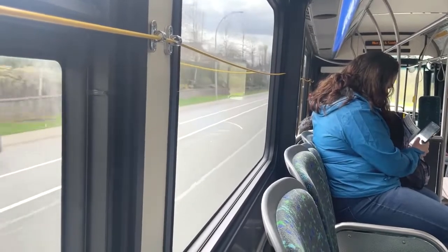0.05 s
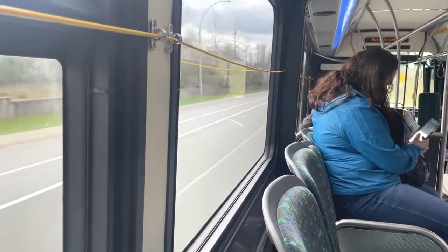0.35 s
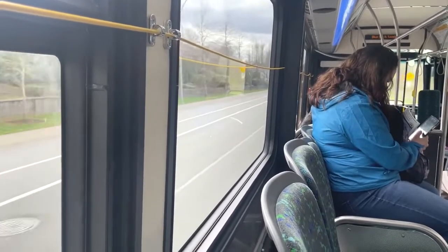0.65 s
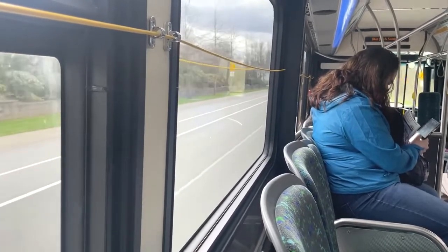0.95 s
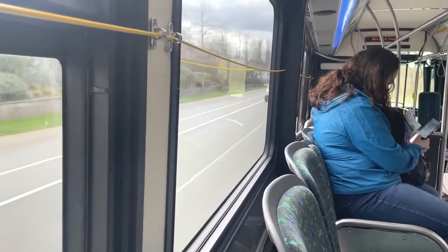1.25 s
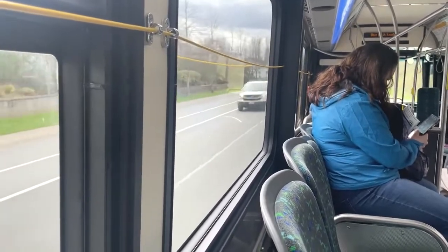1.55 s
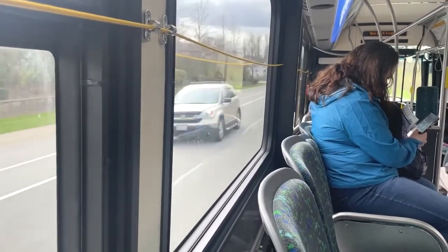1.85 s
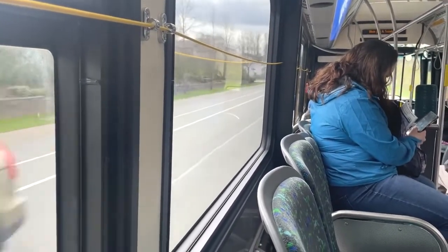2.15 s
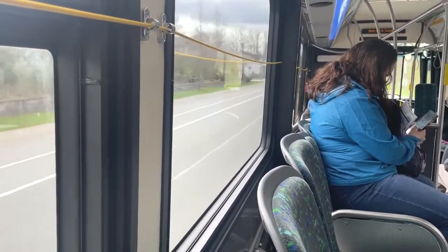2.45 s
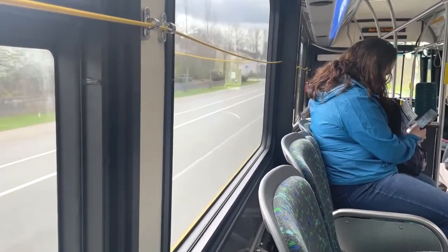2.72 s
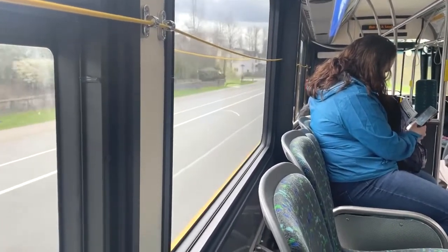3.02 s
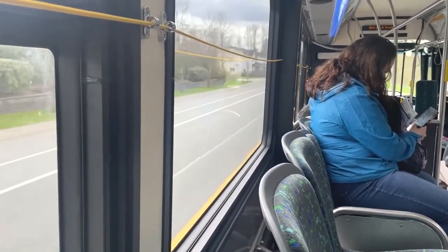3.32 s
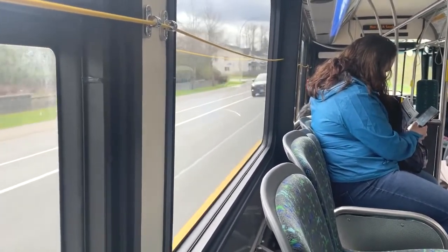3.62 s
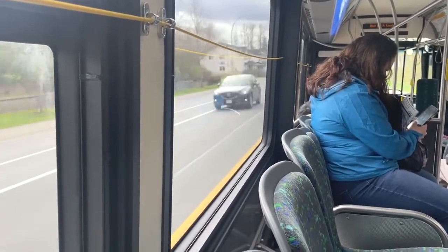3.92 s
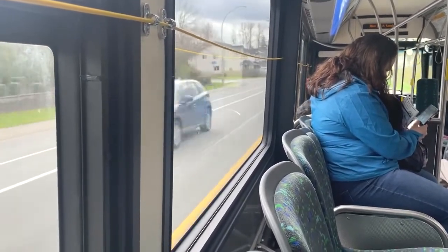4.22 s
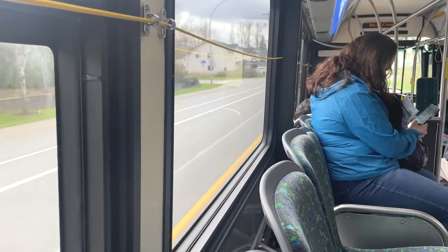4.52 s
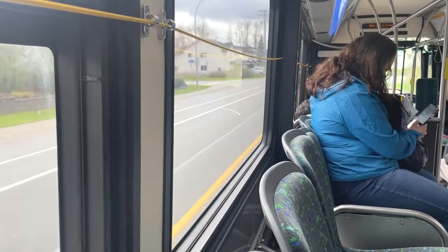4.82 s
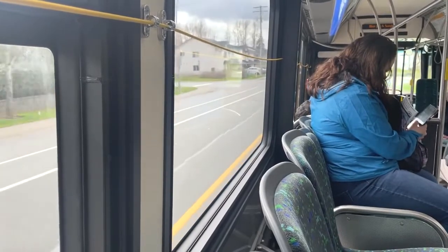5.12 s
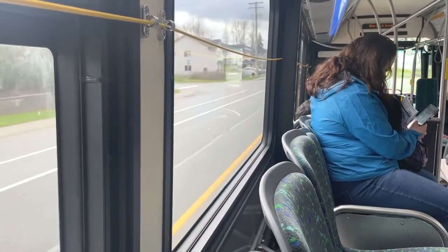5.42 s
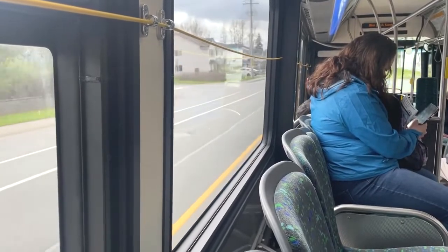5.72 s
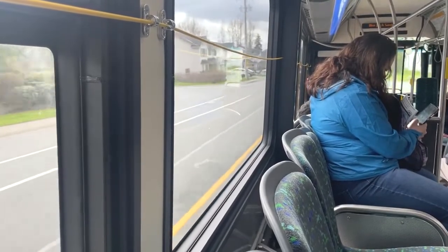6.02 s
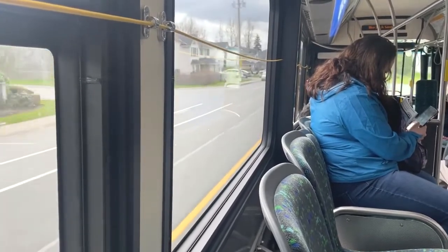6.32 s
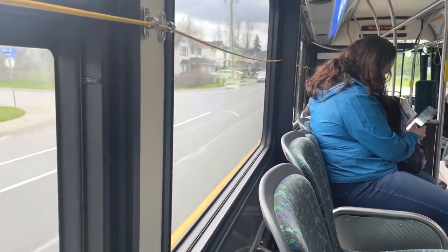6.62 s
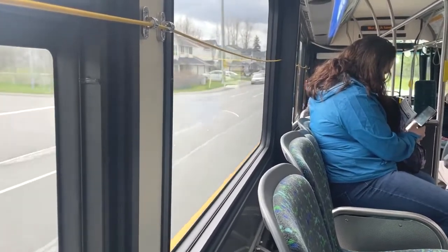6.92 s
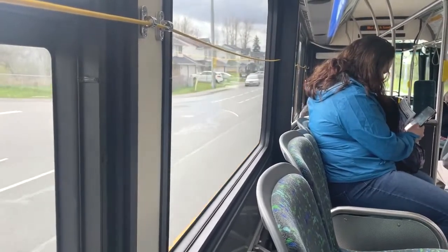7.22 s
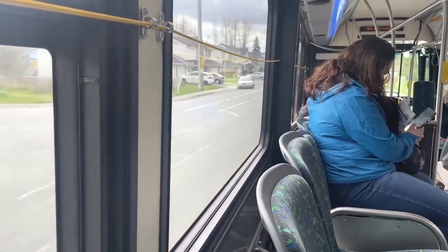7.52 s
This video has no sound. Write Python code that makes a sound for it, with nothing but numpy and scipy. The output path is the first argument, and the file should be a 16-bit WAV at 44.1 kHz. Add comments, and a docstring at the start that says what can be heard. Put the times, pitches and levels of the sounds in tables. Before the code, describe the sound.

Inside a moving city bus, a deep diesel hum swells over steady tyre roar while fittings chirp, tick and clink.

```python
"""A deep diesel boom over tyre roar, heard from a seat in a moving city bus. The six-cylinder engine
slowly loses revs, so its firing note sinks into a cabin resonance and grows louder, throbbing against
the propeller shaft. A pump hums, the alternator whines faintly and the road rumbles through the body.
As the bus shakes, a dry fitting chirps, window trim ticks and a loose metal part clinks."""
import sys
import numpy as np
from scipy import signal
from scipy.fft import rfft, irfft
from scipy.io import wavfile

SR = 44100
rng = np.random.default_rng(int(sys.argv[2]) if len(sys.argv) > 2 else 0)


def unload_audio(sound):
    """Save the sound as a 16-bit wav file, at the path given as the first command line argument."""
    columns = np.transpose(np.atleast_2d(sound))
    # keep every value between -1 and 1, then stretch to whole-number steps
    steps = np.round(np.clip(columns, -1, 1) * 32767)
    wavfile.write(sys.argv[1], SR, steps.astype(np.int16))


N = 333396
TIME = np.arange(N) / SR
BIN_HZ = np.maximum(np.arange(N // 2 + 1) * SR / N, 1)
OPPOSED = np.array([[1], [-1]])   # pan_db is left minus right; lead_rad is the left side's phase lead


# the firing note swells as it sinks into the cabin resonance: time_s, level_db
FIRING_LEVEL = [(0, -22.5), (.8, -25), (1.1, -19.5), (1.4, -18.5), (2.15, -20), (2.5, -18), (3, -18),
                (3.7, -14.5), (5, -13.5), (7.5, -13)]
# its stereo place shifts as the pitch falls: time_s, pan_db, lead_rad
FIRING_PATH = [(0, -1.6, .7), (1.1, -3.2, .34), (2.1, -3.2, .27), (3.1, -2.8, .07), (5.1, -1.4, .01),
               (7.5, -.8, .02)]
# the hum at four times crank speed: time_s, level_db
FOURTH_LEVEL = [(0.0, -25), (0.6, -23), (1.05, -29), (1.5, -25.5), (2.3, -28), (3.3, -32), (4, -29),
                (5.8, -29), (7.3, -27)]
# the growl dies down as the engine is unloaded: crank_multiple, initial_db, fade_db_per_s, pan_db
GROWL_ORDERS = [(9, -35, 2.2, -6.5), (10, -35, 3, -0.5), (12, -48, 1.5, 0)]
# the bed of lesser engine tones: crank_multiple, mid_gain_db, side_gain_db
ENGINE_ORDERS = [(1, -41, -63), (1.5, -37, -69), (2, -37, -57), (2.5, -37, -70), (4.5, -40, -54),
                 (5, -38, -55), (6, -46, -53), (7.5, -45, -69), (15, -49, -54), (17, -52, -54),
                 (23, -54, -60), (25, -59, -58), (26, -55, -60), (27, -50, -47.5), (28, -58, -55),
                 (30, -56, -54), (33, -58, -61), (35, -55, -65), (36, -57, -59), (40, -57, -56),
                 (42, -57, -55)]

def engine(crank_hz):
    """Three firings a turn boom in the cabin; the other engine orders hum and growl around them."""
    firing_db, fourth_db = in_time(FIRING_LEVEL) + in_time(FOURTH_LEVEL)
    crank = turning(crank_hz)
    boom = tone(3 * crank, firing_db, *in_time(FIRING_PATH))
    hum = tone(4 * crank, fourth_db + .98 * drift(1.2), pan_db=1, lead_rad=.09)
    growl = 0
    for multiple, initial_db, fade_db_per_s, pan_db in GROWL_ORDERS:
        level_db = initial_db - fade_db_per_s * TIME + 2.2 * drift(3.5)
        growl += tone(multiple * crank, level_db, pan_db, lead_rad=-.3)
    bed = from_db(1.2) * orders(crank + .028 * drift(1.8), ENGINE_ORDERS, waver_db=2)
    return boom + hum + growl + bed


# the shaft's throb: time_s, level_db
THROB_LEVEL = [(0, -46), (.8, -42), (1.2, -29), (1.7, -33), (2.35, -22), (3.1, -23.7), (3.6, -18.5),
               (3.95, -28), (4.4, -20), (5, -28), (5.45, -24.5), (6, -36), (6.6, -40), (7.5, -37)]
# its lesser tones: shaft_multiple, mid_db, side_db
SHAFT_ORDERS = [(1, -33, -48), (4, -40, -56)]

def propeller_shaft(crank_hz, overdrive_ratio=1.3592):
    """The joints pulse twice a turn, just below the firing note, and the two beat."""
    throb_db, = in_time(THROB_LEVEL)
    overrun = 1 + .0089 * np.exp(-TIME / 1.4)   # at first the wheels run a little ahead of the engine
    shaft = turning(overdrive_ratio * crank_hz * overrun)
    throb = tone(2 * shaft + .047 * drift(1.6), throb_db, pan_db=.7, lead_rad=0)
    return throb + orders(shaft, SHAFT_ORDERS, waver_db=-.3)


# the low rumble's colour: freq_hz, gain_db
RUMBLE_COLOUR = [(10, -21.5), (20, -20), (30, -10.5), (42, 1.5), (50, -6.5), (60, 2.5), (80, -3), (105, -4),
                 (150, -14), (250, -69), (1000, -87.5)]
# its fader ride: time_s, level_db
RUMBLE_LEVEL = [(0, -18), (.5, -24), (2.5, -27.5), (4.5, -25.5), (6, -22.5), (7.5, -25)]
# the panels' drone: freq_hz, gain_db
DRONE_COLOUR = [(40, -31), (70, -19.5), (105, -1), (140, 1.5), (175, -2.5), (205, 1), (255, -8),
                (400, -7.5), (520, -11.5), (750, -25), (1400, -89.5), (4000, -100)]
# its fader ride: time_s, gain_db
DRONE_GAIN = [(0.0, -26), (2.36, -25.5), (4.02, -26), (6.34, -27), (7.56, -24.5)]
# the tyres' midrange roar: freq_hz, gain_db
TYRE_COLOUR = [(100, -46.5), (300, -18), (500, -4.5), (620, 0), (860, -3), (970, -5.5), (1080, -3.3),
               (1300, -3), (1430, -6.5), (1750, -7), (2200, -15.5), (2800, -21), (3800, -28), (7000, -66.5),
               (12000, -95.5)]
# the hiss of rushing air: freq_hz, gain_db
AIR_COLOUR = [(1500, -15), (2800, 10), (3600, 4.5), (4700, 4), (6300, -2), (7500, -10), (8700, -20.5),
              (10000, -7.5), (12000, -20), (14500, -23.5), (16000, -24.5)]

def road():
    """The road shakes the body and panels; tyre roar and rushing air come through the glass."""
    rumble_db, drone_db = in_time(RUMBLE_LEVEL) + in_time(DRONE_GAIN)
    tyre_db = -31.51 - .24 * TIME   # quieter as the bus slows
    rumble = noise(RUMBLE_COLOUR, from_db(rumble_db + drift(1.5)))
    drone = noise(DRONE_COLOUR, from_db(drone_db + .44 + .34 * drift(19)))
    tyres = noise(TYRE_COLOUR, from_db(tyre_db + 1.06 * drift(5.7)))
    air = noise(AIR_COLOUR, from_db(-47 + 1.2 * drift(19)))
    return rumble + drone + tyres + air


# the pump's hum moves through the cabin's standing waves: time_s, level_db, pan_db, lead_rad
PUMP_HUM_PATH = [(0, -33, 4, 0.2), (1.1, -36, 2.7, -1), (2.1, -30.5, -9.5, -.5), (3.1, -32, -2, 1),
                 (4.1, -33, 3, 2.3), (5.1, -29.5, 7.5, 1.5), (6.1, -36.5, -3, 3), (6.9, -33, -1, 0.5),
                 (7.35, -28.5, 0, 0.1)]
# its whine, an octave up: time_s, level_db
PUMP_WHINE_LEVEL = [(0.0, -34), (0.7, -31.5), (1.05, -49), (1.5, -36.5), (2.5, -38.5), (2.9, -49),
                    (3.4, -47), (3.75, -38.5), (4.6, -37), (5, -33), (5.5, -37), (5.9, -36.5), (7.4, -37.5)]
# the whine's stereo place: time_s, pan_db, lead_rad
PUMP_WHINE_PATH = [(0, 2.8, .3), (1.1, 2.8, -.1), (2.5, .5, 1.6), (4.1, -7, -1.3), (6.1, -4, -1.1),
                   (7.3, 0, -1.9)]
# faint upper tones: rotor_multiple, mid_db, side_db
PUMP_ORDERS = [(3, -48, -48), (4, -53, -51), (5, -55, -66)]

def pump(crank_hz, belt_ratio=7.055):
    """The pump hums with a flickering level; the belt lets its speed wander a little."""
    hum_db, *hum_place = in_time(PUMP_HUM_PATH)
    whine_db, = in_time(PUMP_WHINE_LEVEL)
    rotor = turning(belt_ratio * crank_hz) + .27 * drift(2.4)
    hum = tone(rotor + .4 * drift(6), hum_db + 1.5 * drift(9.9), *hum_place)
    whine = tone(2 * rotor, whine_db, *in_time(PUMP_WHINE_PATH))
    return hum + whine + orders(rotor, PUMP_ORDERS, waver_db=4.5)


# the gear whine's fader ride: time_s, gain_db
GEAR_GAIN = [(0.0, -40.5), (2.2, -37), (3.6, -34), (3.8, -40.5), (4.2, -35.5), (4.7, -44), (6.5, -36),
             (7.1, -38), (7.4, -65)]
# its stereo place: time_s, pan_db, lead_rad
GEAR_PATH = [(0, -2.5, -1.3), (2.1, 4.8, 0), (4.1, -4.8, -.2), (5.1, -5.2, -.6), (7.1, 2.5, -.8)]

def timing_gears(crank_hz):
    """The gears whine at 18 times crank speed, wavering slightly."""
    gear_db, = in_time(GEAR_GAIN)
    mesh = 18 * turning(crank_hz) + .1 * drift(5.4)
    return tone(mesh, gear_db + .8 + .7 * drift(8.9), *in_time(GEAR_PATH))


def singing_panel(crank_hz, centre_hz=596, width_hz=22):
    """The 20th engine order sings as it glides through a panel's resonance."""
    pitch_hz = 20 * crank_hz
    resonance = 1 / np.hypot(1, 2 * (pitch_hz - centre_hz) / width_hz)
    return resonance * tone(turning(pitch_hz), -40.5 + 1.2 * drift(5.8), pan_db=-4, lead_rad=.91)


# the dry fitting's featured chirps: start_s, gain_db, pitch_hz
CHIRPS = [(0.740, -29, 2680), (0.840, -28, 2800), (0.854, -29, 2750), (0.8613, -35.5, 2740),
          (0.875, -30, 2800), (0.9478, -30.5, 2700), (0.957, -33, 2680), (1.65, -35, 2690),
          (1.757, -29, 2840), (1.768, -28.5, 2670), (1.839, -29, 2810), (2.263, -28.5, 2680),
          (2.529, -33, 2770), (2.767, -28.5, 2640), (3.29, -28.5, 2680), (3.345, -34.5, 2680),
          (3.37, -27.5, 2810), (3.466, -29.5, 2840), (3.689, -34, 2670), (4.026, -28.5, 2890),
          (5.229, -23.5, 2800), (5.66, -32, 2670), (5.768, -31.5, 2900), (5.864, -29.5, 2730),
          (6.369, -23, 2730), (6.392, -29, 2850), (6.504, -31, 2640), (7.259, -33.5, 2680),
          (7.341, -27.5, 2740)]
# the snap on each attack: freq_hz, gain_db
SNAP_COLOUR = [(800, -25), (2000, -5), (2800, 0), (3700, -3), (5500, -13), (8000, -28), (16000, -55)]
# the echoes and faint stray chirps: freq_hz, gain_db
CHIRP_COLOUR = [(500, -70.5), (1500, -25), (2300, -14), (2650, 1.5), (2930, -6), (3250, -17.5),
                (4200, -25.5), (8000, -56.5), (16000, -77)]

def fitting(rise_s=.0011):
    """A dry joint lets go with a snap and a chirp that dies almost as fast as it swells, then echoes."""
    chirps = np.zeros((2, N))
    age = TIME[:SR // 20]
    swell = age / rise_s * np.exp(1 - age / rise_s)
    for start_s, gain_db, pitch_hz in CHIRPS:
        start = int(start_s * SR)
        note = tone(2 * np.pi * pitch_hz * age, gain_db - 1.2, pan_db=3, lead_rad=1) / np.sqrt(2)
        chirps[:, start:start + len(age)] += swell * note
    snaps = sum(burst(start_s, gain_db - 10, t60_s=.035) for start_s, gain_db, _ in CHIRPS)
    echoes = sum(burst(start_s, gain_db - 19.5, t60_s=.1) for start_s, gain_db, _ in CHIRPS)
    strays = stray_bursts(per_s=2, level_db=-46, t60_s=.024)
    return chirps + noise(SNAP_COLOUR, snaps) + noise(CHIRP_COLOUR, echoes + strays)


# the trim's featured ticks: start_s, gain_db
TICKS = [(0.164, -36.5), (0.35, -37), (0.875, -45), (0.957, -45), (0.982, -47), (1.304, -37),
         (1.4922, -41.5), (1.717, -42.5), (2.171, -40), (2.339, -40.5), (2.572, -43), (2.624, -44.5),
         (2.744, -32.5), (2.9086, -35), (3.0072, -34), (3.079, -44), (3.342, -40.5), (3.631, -43.5),
         (3.8223, -39), (3.916, -44.5), (4.186, -34.5), (4.380, -43.5), (4.7172, -37), (4.7892, -38),
         (4.84, -40), (4.912, -42), (5.108, -35), (5.205, -39), (5.3984, -39), (5.474, -34.5),
         (5.6956, -39.5), (5.768, -23.5), (5.815, -40.5), (5.991, -43), (6.038, -38.5), (6.2118, -40),
         (6.261, -38), (6.279, -38.5), (6.2856, -40), (6.334, -37.5), (6.5084, -36), (6.5557, -41.5),
         (6.586, -41.5), (6.785, -43), (6.833, -44.5), (6.944, -38), (6.956, -38), (7.0567, -39.5),
         (7.105, -41.5), (7.183, -37), (7.354, -39), (7.481, -35), (7.532, -37)]
# the fine rattle wakes as the boom builds: time_s, level_db
RATTLE_LEVEL = [(0, -61), (2, -60), (2.4, -54), (3.9, -55.5), (5.2, -52), (5.9, -54), (6.4, -50.5),
                (7.5, -52.5)]
# the bright click of plastic: freq_hz, gain_db
TICK_COLOUR = [(1000, -19.5), (2500, 2.5), (4500, 4), (7000, 4), (10000, 4), (12000, -4.5), (13500, -8.5),
               (16000, -16)]

def window_trim():
    """Plastic trim ticks, each with a short cabin echo, over a fine rattle of lighter contacts."""
    rattle_db, = in_time(RATTLE_LEVEL)
    ticks = sum(burst(start_s, gain_db - 3.5, t60_s=.011) for start_s, gain_db in TICKS)
    echoes = sum(burst(start_s, gain_db - 17.5, t60_s=.096) for start_s, gain_db in TICKS)
    rattle = stray_bursts(per_s=27, level_db=rattle_db, t60_s=.016)
    return noise(TICK_COLOUR, ticks + echoes + rattle)


# small metal clinks: start_s, gain_db
CLINKS = [(0.164, -39), (0.35, -38), (0.875, -45), (0.980, -41), (1.305, -39), (1.389, -39), (1.490, -39),
          (1.716, -42), (1.811, -38), (2.386, -40), (2.573, -42), (2.905, -38), (3.502, -38), (4.038, -37),
          (4.474, -40), (4.854, -35), (4.886, -41), (5.401, -36), (6.279, -39), (6.944, -40), (7.182, -41),
          (7.327, -39), (7.528, -39)]

def clinks(centre_hz=4586):
    """A loose metal part touches and rings briefly, never at quite the same pitch."""
    out = np.zeros((2, N + SR))
    age = TIME[:SR // 5]
    for start_s, gain_db in CLINKS:
        start = int(start_s * SR)
        pitch_hz = centre_hz * (1 + .011 * rng.standard_normal())
        ring = tone(2 * np.pi * pitch_hz * age, gain_db - 6.5, pan_db=4, lead_rad=.65)
        out[:, start:start + len(age)] += ring * decay(age, t60_s=.04)
    return out[:, :N]


# longer slips of the dry fitting: start_s, length_s, pitch_hz, peak_db
SQUEAKS = [(5.154, 0.028, 3170, -45), (5.197, 0.038, 3040, -41), (7.52, .06, 3500, -43)]

def squeaks():
    """When the joint slides for longer it holds a thin, unsteady note."""
    out = np.zeros((2, N))
    for start_s, length_s, pitch_hz, peak_db in SQUEAKS:
        swell = np.sin(np.pi * np.clip((TIME - start_s) / length_s, 0, 1))
        phase = 2 * np.pi * pitch_hz * TIME + .5 * drift(50)
        out += swell * tone(phase, peak_db, pan_db=1.5, lead_rad=.4) / np.sqrt(2)
    return out


# soft scuffs: start_s, level_db, t60_s
SCUFFS = [(0.87, -54, .25), (0.98, -52, 0.24), (2.282, -45.5, 0.38), (5.72, -61, 0.49), (6.361, -51, 0.23)]
# their papery top end: freq_hz, gain_db
SCUFF_COLOUR = [(2500, -18), (5000, 0.5), (6800, 5), (9000, -10), (11500, -9), (13000, -24), (16000, -41)]

def scuffs():
    """Something light rubs briefly, catching as it slides."""
    catching = from_db(6 * drift(120))
    return noise(SCUFF_COLOUR, catching * sum(burst(*scuff) for scuff in SCUFFS))


# the alternator's whine comes and goes: time_s, level_db
ALTERNATOR_LEVEL = [(3.4, -78), (3.8, -62), (3.98, -66), (4.12, -61.5), (4.3, -67), (4.5, -61.5),
                    (4.7, -68), (5.05, -59.5), (5.45, -61.5), (5.65, -69), (5.9, -64), (6.3, -78)]

def alternator(crank_hz, cycles_per_crank_turn=150.3):
    """A faint, high whine flickers and wanders a little on the belt."""
    whine_db, = in_time(ALTERNATOR_LEVEL)
    phase = turning(cycles_per_crank_turn * crank_hz) + .8 * drift(6)
    return tone(phase, whine_db + 3 * drift(10), pan_db=4, lead_rad=.6)


# stereo width of the noise, side against mid: freq_hz, side_db
STEREO_WIDTH = [(30, -19), (80, -21), (140, -16), (200, -9), (260, -3.5), (320, -6), (600, -3.5),
                (900, -.5), (1100, -3), (1750, -.5), (2200, -1.5), (2800, -5), (4200, -4), (7200, -4),
                (8300, -16), (9800, -4), (11700, -14), (13200, -2), (15000, -16)]
# its left-right balance: freq_hz, pan_db
STEREO_PAN = [(60, -.5), (120, .3), (230, .5), (460, .5), (900, 2.4), (1760, 2), (3500, 2), (6800, 1),
              (13000, -.5)]
# its left-right phase: freq_hz, lead_rad
STEREO_LEAD = [(1000, 0), (1500, -.5), (2200, .5), (2800, .85), (4000, .1), (5000, .5), (6000, 0),
               (7200, -1.6), (8300, -3.14), (9800, -4.7), (11700, -6.28), (15000, -9.42)]

def noise(colour, envelope):
    """Coloured noise whose rms follows the envelope, spread in stereo."""
    white = rng.standard_normal((2, N)) * envelope
    mid, side = rfft(white) * rms_one(per_bin(colour) * standing_waves())
    width = per_bin(STEREO_WIDTH)
    lead_rad = np.interp(BIN_HZ, *np.transpose(STEREO_LEAD))
    stereo = (mid + OPPOSED * width * side) / np.sqrt(1 + width ** 2)
    panned = stereo * per_bin(STEREO_PAN) ** (OPPOSED / 2)
    return irfft(panned * np.exp(1j * OPPOSED * lead_rad / 2), N)


def standing_waves(depth_db=2.4, spacing_hz=20):
    """The cabin's reflections put narrow peaks and dips into the spectrum, shallower in the bass."""
    knots_hz = np.arange(SR // 2 + 1) * spacing_hz
    ripple = np.interp(BIN_HZ, knots_hz, rng.standard_normal(len(knots_hz)).clip(-2, 1.5))
    return from_db(depth_db * ripple * np.minimum(BIN_HZ / 900, 1))


def turning(speed_hz):
    """Angle of a shaft in radians."""
    return 2 * np.pi * np.cumsum(speed_hz) / SR


def tone(angle, level_db, pan_db, lead_rad):
    """A sine at an rms level, placed in stereo by level and phase."""
    amplitude = np.sqrt(2) * from_db(level_db + OPPOSED * pan_db / 2)
    return amplitude * np.cos(angle + OPPOSED * lead_rad / 2)


def orders(angle, table, waver_db):
    """Tones at multiples of a shaft's speed; each swells and fades on its way through the body."""
    mid, side = np.zeros((2, N))
    for multiple, mid_db, side_db in table:
        swell = from_db(waver_db * drift(2.2))
        mid_phase, side_phase = rng.uniform(0, 2 * np.pi, 2)
        mid += from_db(mid_db) * swell * np.sin(multiple * angle + mid_phase)
        side += from_db(side_db) * swell * np.sin(multiple * angle + side_phase)
    return np.sqrt(2) * (mid + OPPOSED * side)


def burst(start_s, peak_db, t60_s):
    """Envelope of one contact: sudden, then dying away."""
    out, start = np.zeros(N), int(start_s * SR)
    age = TIME[:min(N - start, SR // 3)]
    out[start:start + len(age)] = from_db(peak_db) * decay(age, t60_s)
    return out


def stray_bursts(per_s, level_db, t60_s):
    """Envelope of faint contacts that come at random, in clusters as the body flexes."""
    sizes = from_db(level_db + 1.5 * rng.standard_normal(N).clip(-2, 2))
    hits = rng.random(N) < per_s * from_db(4 * drift(3)) / SR
    return signal.lfilter([1], [1, -decay(1 / SR, t60_s)], hits * sizes + 1e-18)


def decay(age_s, t60_s):
    """A tail that falls 60 dB in t60_s."""
    return np.exp(-np.log(1000) * age_s / t60_s)


def drift(rate_hz):
    """Smooth random modulation with an rms of about 1."""
    hop, settle = 100, 1000
    pole = np.exp(-2 * np.pi * rate_hz * hop / SR)
    white = rng.standard_normal(N // hop + settle + 2)
    slow = signal.lfilter([1], [1, -2 * pole, pole * pole], white)[settle:]
    return np.interp(np.arange(N) / hop, np.arange(len(slow)), rms_one(slow))


def in_time(rows):
    """A list of automation curves, one for each column after time_s."""
    time_s, *columns = np.transpose(rows)
    return [np.interp(TIME, time_s, column) for column in columns]


def per_bin(points):
    """An EQ curve as a gain for every frequency bin."""
    freq_hz, gain_db = np.transpose(points)
    return from_db(np.interp(np.log(BIN_HZ), np.log(freq_hz), gain_db))


def from_db(db):
    return 10 ** (np.asarray(db) / 20)


def rms_one(x):
    return x / np.sqrt(np.mean(x ** 2) + 1e-20)


def scene():
    """Everything that turns follows the slowing crankshaft; road and small cabin noises fill in."""
    crank_hz = 31.805 - .3241 * TIME   # the bus coasts down evenly
    drivetrain = engine(crank_hz) + propeller_shaft(crank_hz)
    whines = pump(crank_hz) + timing_gears(crank_hz) + singing_panel(crank_hz) + alternator(crank_hz)
    cabin = fitting() + window_trim() + clinks() + squeaks() + scuffs()
    return drivetrain + road() + whines + cabin


def record(dry):
    """The ends are eased over a few milliseconds and the top is cut steeply."""
    cutoff_hz = 15600
    eased = dry * signal.windows.tukey(N, .001)
    return signal.sosfilt(signal.ellip(10, .1, 80, cutoff_hz, fs=SR, output="sos"), eased)


dry = scene()
out = record(dry)
unload_audio(out)
```